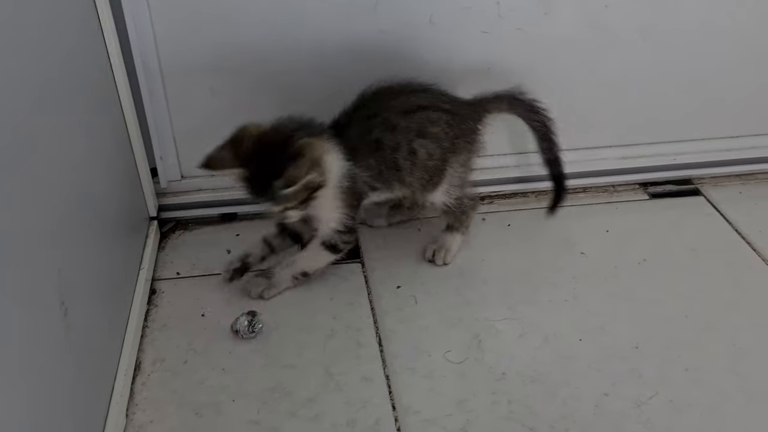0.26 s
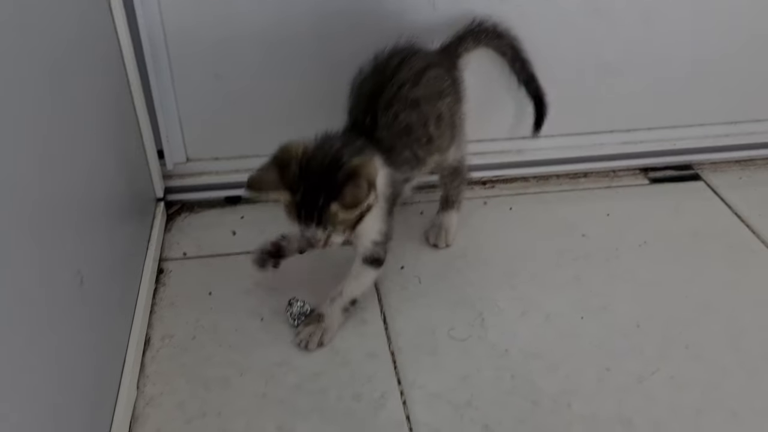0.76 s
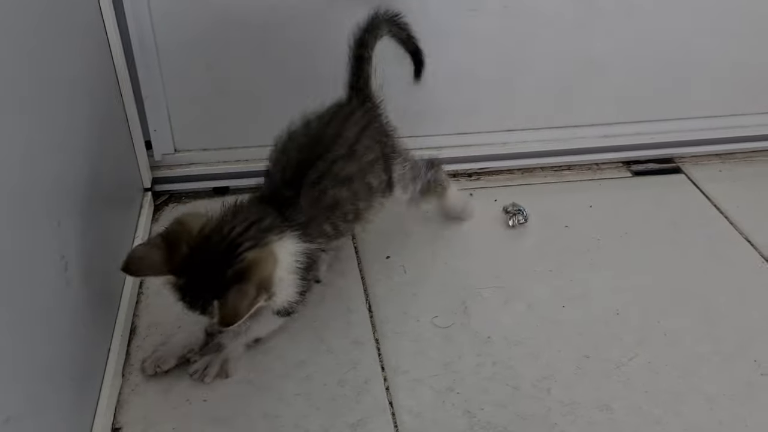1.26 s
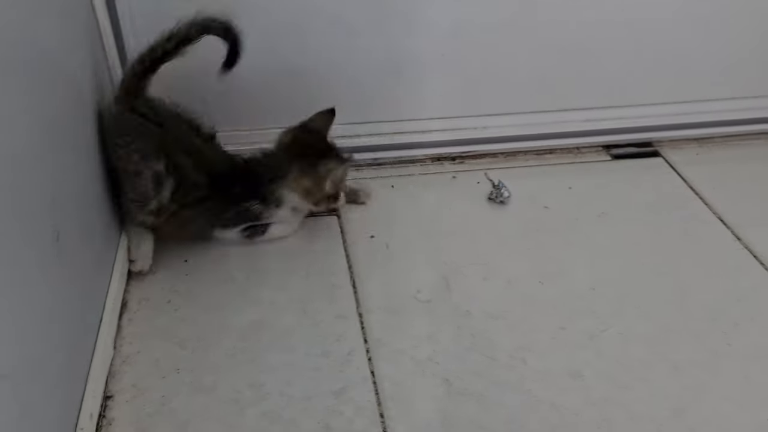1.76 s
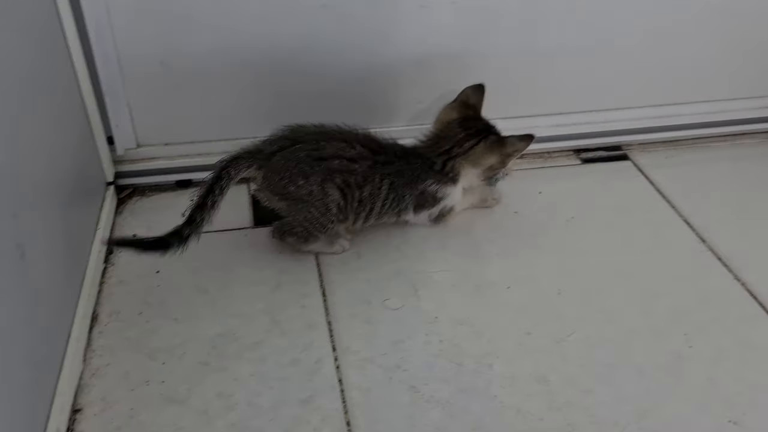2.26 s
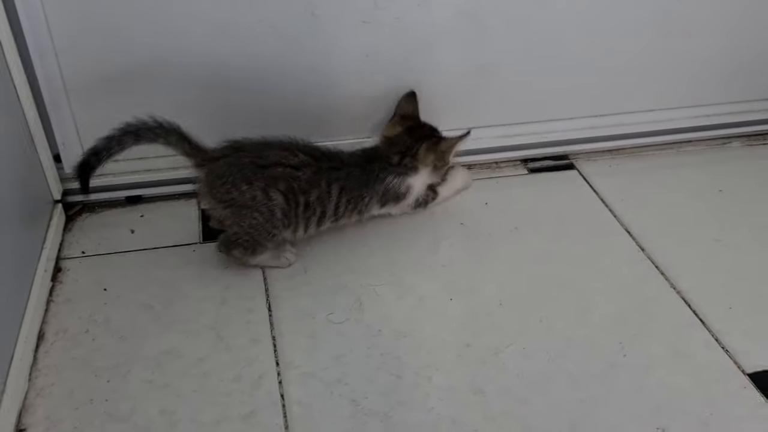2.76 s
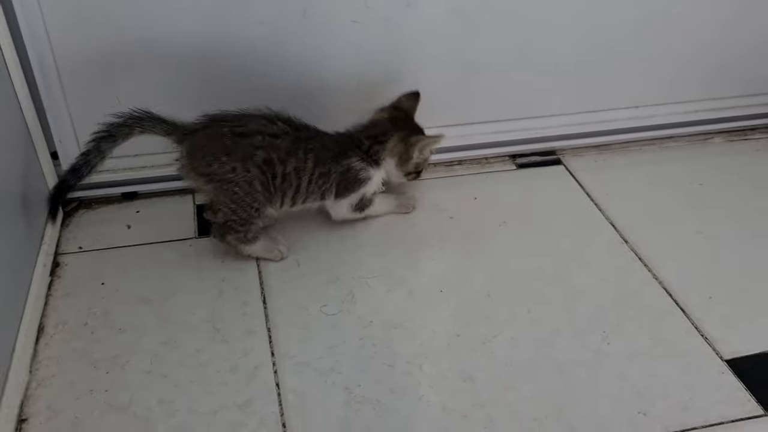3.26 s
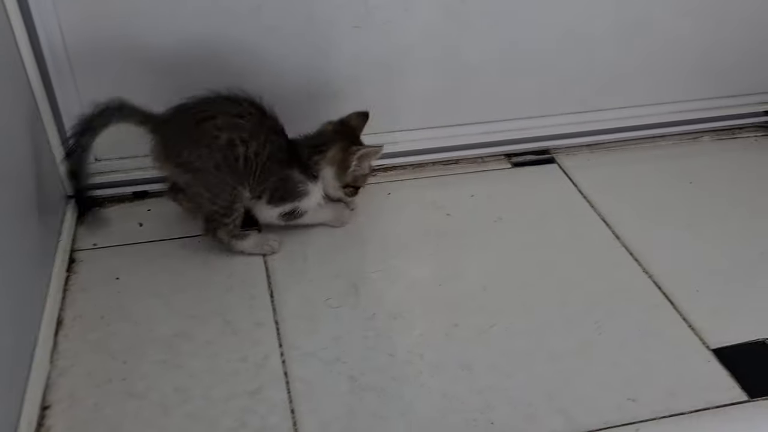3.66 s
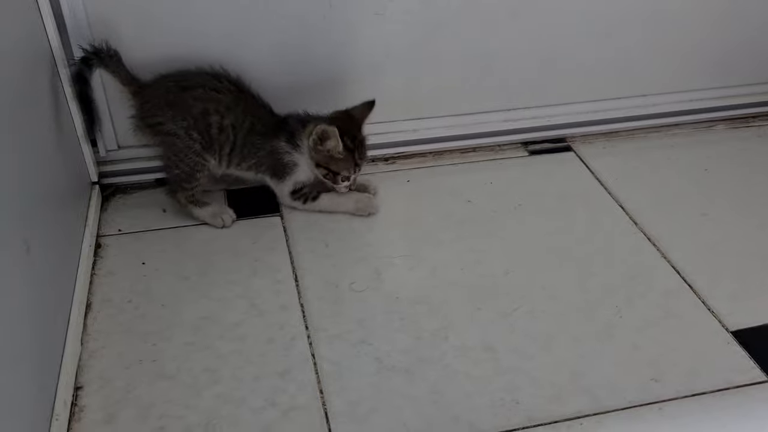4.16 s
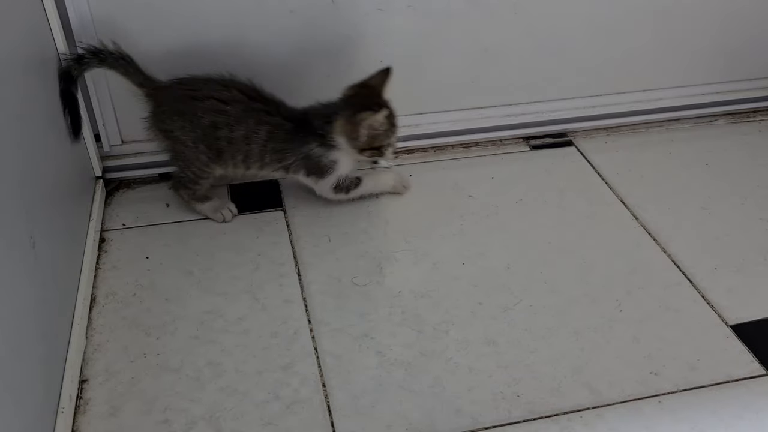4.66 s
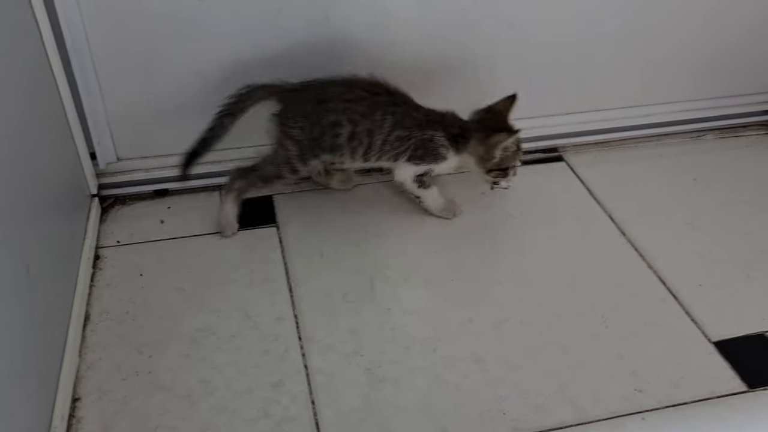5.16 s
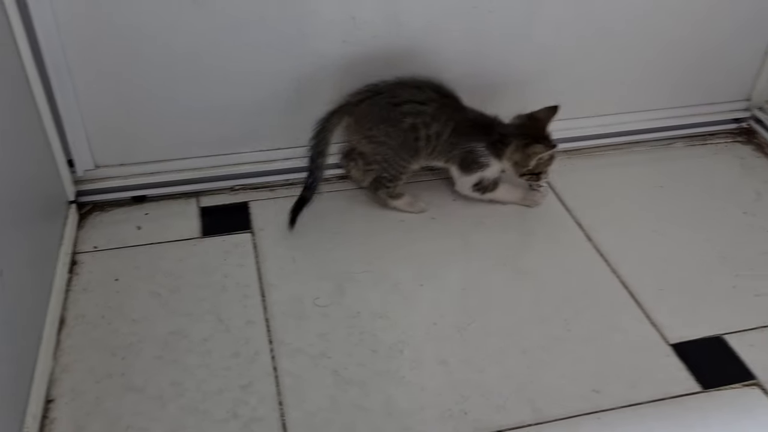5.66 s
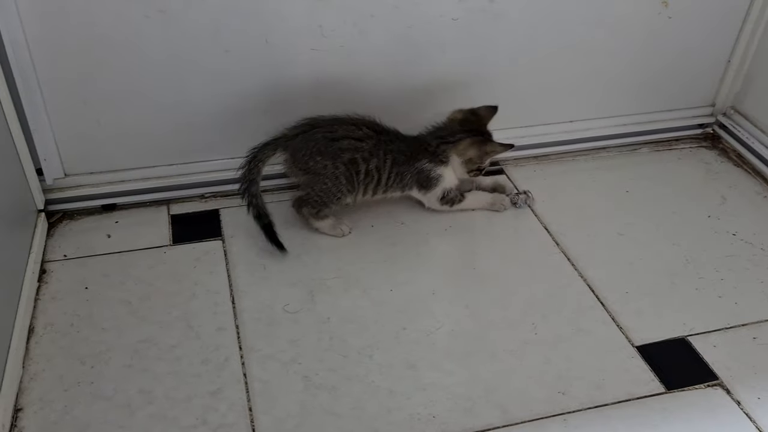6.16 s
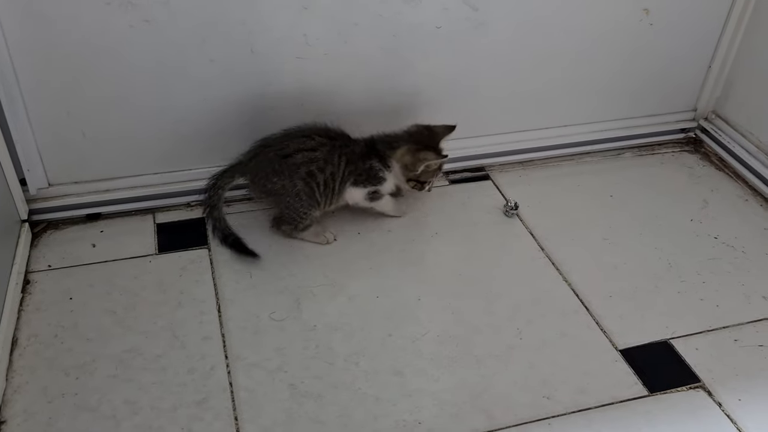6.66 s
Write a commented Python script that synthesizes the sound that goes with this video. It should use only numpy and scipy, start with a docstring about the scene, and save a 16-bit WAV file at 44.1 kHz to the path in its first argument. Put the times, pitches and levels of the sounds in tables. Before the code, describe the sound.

A kitten plays with a small crumpled foil ball on a tiled floor, heard from nearby with a short room echo. Low engine drones and rumble come dully through a door throughout, with tyre noise swelling around 2 seconds and then receding. From the start there are light, bright ticks and short scrapes of foil and claws, a soft paw shuffle at 0.7 seconds and a sharper tick at 1 second. Faint paw squeaks come at 1.5 and 1.7 seconds. Immediately afterwards the kitten bumps the door: a hollow thud with a brief rattle, by far the loudest sound. A flurry of ticks, scrapes and a tiny clink follows from 2 to 2.3 seconds. More taps and skids come from 3 to 3.7 seconds and near 4.4. Soft shuffles and small clinks return around 5.5 to 6 seconds, with faint last ticks near 6.4.

```python
"""Kitten with a foil ball

A kitten bats a small crumpled foil ball over floor tiles in the corner of a room.
The ball ticks, clinks and skids, claws scrape, and soft paws shuffle and squeak.
The kitten slides into the door, which thuds and rattles. Outside, traffic passes:
gliding engine drones and a swell of tyre noise come dully through the door."""
import sys
import numpy as np
from scipy import signal
from scipy.fft import rfft, irfft
from scipy.io import wavfile

SR = 44100
rng = np.random.default_rng(int(sys.argv[2]) if len(sys.argv) > 2 else 0)


def to_wav(sig):
    """Store sig (one row per channel, or 1-D mono) as 16-bit WAV at the path in sys.argv[1].

    Samples outside -1..1 are clipped; the rate is SR.
    """
    pcm = np.clip(np.atleast_2d(sig), -1, 1) * 32767
    pcm = np.round(pcm).astype(np.int16)
    wavfile.write(sys.argv[1], SR, pcm.T)  # frames by channels


N = 304712
TIME, FREQS = np.arange(N) / SR, np.fft.rfftfreq(N, 1 / SR)
TOP_HZ = 15900


def gain_of(db):
    """Turns decibels into a number to multiply by."""
    return 10 ** (np.asarray(db) / 20)


def evened(x):
    """Scales a signal to an average strength (rms) of 1."""
    return x / np.sqrt(np.mean(x ** 2) + 1e-20)


def read(points, hz):
    """Reads between the rows of a (frequency, value) table, giving each octave equal space."""
    f, value = np.transpose(points)
    return np.interp(np.log(hz + 1), np.log(f + 1), value)


def add(mix, s, sound):
    """Lays a sound into the stereo mix, starting at s seconds."""
    part = mix[:, max(round(s * SR), 0):][:, :sound.shape[-1]]
    part += sound[..., :part.shape[1]]


def drift(rate_hz):
    """A smooth random wobble; a higher rate makes it quicker."""
    return evened(irfft(rfft(rng.standard_normal(N)) * np.exp(-(FREQS / rate_hz) ** 2), N))


def panned(left_db):
    """Left and right gains that make the left side louder by left_db."""
    return gain_of(np.array([[left_db], [-left_db]]) / 2)


def diffuse(spectrum):
    """Noise that fills the room: alike on both sides in the bass, unrelated in the treble."""
    # how alike left and right are: (frequency [Hz], likeness [0 to 1])
    likeness = [(20, 0.89), (100, 1), (160, 0.93), (280, 0.87), (450, 0.64), (700, 0.44), (1100, 0.0031),
                (2000, 0), (16000, 0)]
    same = read(likeness, FREQS)
    left, other = rfft(rng.standard_normal((2, N)))
    right = same * left + np.sqrt(1 - same ** 2) * other
    return evened(irfft(np.array([left, right]) * gain_of(read(spectrum, FREQS)), N))


def engine(rows, level_db, waver, octave_db=-30):
    """One engine's drone: the door lets through only its firing note and a little of the octave above."""
    s, hz, db = np.transpose(rows)
    turn = np.exp(2j * np.pi * np.cumsum(np.interp(TIME, s, hz)) / SR)
    fade = np.clip(np.minimum(TIME - s[0], s[-1] - TIME) / .05 + 1, 0, 1)
    note = turn * (1 + waver * (drift(14) + 1j * drift(4.3)))
    octave = gain_of(octave_db) * turn ** 2 * drift(12)
    return np.sqrt(2) * fade * gain_of(np.interp(TIME, s, db) + level_db) * (note + octave).real


def drive_by(nearest_s=2.17, approach_s=.13, hz=136, drop_hz=13):
    """Rows for engine(): a passing vehicle is loudest when nearest, and its pitch falls."""
    along = np.linspace(-6, 6, 49)
    distance = np.hypot(1, along)
    pitch = hz - drop_hz * along / distance
    return np.transpose([nearest_s + approach_s * along, pitch, -20 * np.log10(distance)])


def engines():
    """Four engine drones from the street, each gliding in pitch; the far engine's octave also rises as a hum of
    its own."""
    # one line per table: (time [s], firing rate [Hz], level [dB]); far_hum is the far engine's octave, with its
    # pitch in the second column
    low_engine = [(0.11, 40.13, -51), (0.47, 47.77, -39.5), (0.8, 50.8, -39), (1.0, 52.35, -49.5),
                  (1.81, 54.04, -31), (2.05, 55.6, -41), (2.42, 54.7, -38.5), (2.62, 53.7, -28.5),
                  (3.02, 49.3, -51), (3.23, 45, -36), (3.56, 37.67, -29.5), (3.9, 33.55, -45)]
    high_engine = [(0.01, 97.8, -43.5), (0.48, 89.9, -48.5), (1.08, 93.7, -29), (1.2, 95.14, -38),
                   (1.35, 95.8, -28), (1.83, 98.5, -37), (2.29, 99.3, -38), (2.85, 98.36, -44),
                   (2.98, 99.15, -37.5), (3.33, 97.23, -53), (3.67, 95.7, -31.5), (4.09, 87.4, -40)]
    far_engine = [(3.96, 64.2, -42.5), (4.17, 67.47, -35), (4.55, 72.96, -35), (4.86, 76.4, -40.1),
                  (5.21, 68.6, -66), (5.49, 71.6, -40.5), (5.67, 71.55, -38.5), (5.89, 74, -58)]
    far_hum = [(5.0, 145, -64), (5.4, 147, -50.5), (5.9, 149, -51), (6.2, 151, -58.5), (6.91, 158, -58)]
    return (engine(low_engine, level_db=0, waver=0.28, octave_db=-34.5)
            + engine(high_engine, level_db=-0.5, waver=0.32, octave_db=-39)
            + engine(far_engine, level_db=-2.5, waver=0.63, octave_db=-17)
            + engine(far_hum, level_db=-3, waver=0.14)
            + engine(drive_by(), level_db=-46, waver=0.31))


def street_noise(spectrum, curve, nearest_db, follow):
    """One layer of traffic noise; it sinks by `follow` dB for each dB that its level curve falls."""
    s, db = np.transpose(curve)
    return gain_of(nearest_db + follow * np.interp(TIME, s, db - db.max())) * diffuse(spectrum)


def exhaust(nearest_s=0.77, fade_s=1.35, level_db=-55.5):
    """A rasping exhaust comes close early on, then draws away."""
    # tone of the rasp: (frequency [Hz], level [dB])
    rasp = [(300, -18), (500, 2.5), (600, 3), (700, -0.5), (820, -1.5), (950, -11.5), (1300, -23),
            (3000, -47.5)]
    return gain_of(level_db) / np.hypot(1, (TIME - nearest_s) / fade_s) * diffuse(rasp)


def standing_waves(x, depth_db=2.0, spacing_hz=23.79):
    """Sound bouncing between the walls lifts some frequencies and sinks others."""
    ripple = np.interp(FREQS / spacing_hz, np.arange(4096), rng.standard_normal(4096))
    return irfft(rfft(x) * evened(gain_of(depth_db * ripple)), N)


def traffic():
    """Engines, road rumble and tyres: as the traffic draws away the treble fades fastest."""
    # rise and fall of the road and tyre noise: (time [s], level [dB])
    road_curve = [(0.0, -53.5), (1.65, -52.5), (1.94, -49.5), (3.12, -54), (3.98, -52.5), (4.79, -57.5),
                  (5.72, -57), (6.0, -58.5), (6.39, -59), (6.91, -59.5)]
    tyre_curve = [(0.0, -58.5), (0.65, -56.5), (1.58, -57), (2.13, -52.5), (2.29, -53), (2.89, -57.5),
                  (3.06, -58), (4.58, -66), (5.16, -64.5), (5.39, -67), (5.91, -67.5), (6.31, -69.5),
                  (6.91, -71)]
    # tone of each layer behind the door, lowest first: (frequency [Hz], level [dB])
    rumble = [(15, -27.5), (27, -46.5), (37, 4.5), (48, -1.5), (62, -3.5), (76, -0.5), (86, -4), (97, 3),
              (112, -9.5), (150, -17.5), (200, -21.5), (400, -69)]
    body = [(90, -21), (150, -2), (195, -7), (225, 5), (260, 3), (330, -4.5), (390, -4), (490, -7),
            (600, -16), (800, -37.5), (3000, -64.5)]
    roar = [(500, -32), (850, -7), (1050, -1.5), (1250, -3.5), (1450, -6), (1800, -14), (4000, -52)]
    tread = [(900, -23), (1400, -10), (1600, 0), (1830, 4.5), (1950, 2), (2080, 0), (2350, -8.5),
             (2800, -13.5), (4000, -38), (8000, -55.5)]
    hiss = [(1500, -5.5), (2500, 5.5), (3300, 3.5), (4200, 2), (5100, -5.5), (6000, -1.5), (7200, -8.5),
            (8500, -22), (11500, -15.5), (16000, -27.5)]
    low = engines() + street_noise(rumble, road_curve, nearest_db=-38.5, follow=0.51)
    low += street_noise(body, road_curve, nearest_db=-49, follow=.9)
    high = exhaust() + street_noise(roar, tyre_curve, nearest_db=-53, follow=0.77)
    high += street_noise(tread, tyre_curve, nearest_db=-53.5, follow=1.256)
    high += street_noise(hiss, tyre_curve, nearest_db=-61.5, follow=1.72)
    return low * panned(left_db=0.1) + standing_waves(high) * panned(left_db=-2.5)


def stroke(start, peak, end, edge_db):
    """The swell and fade of one paw stroke; a larger edge_db makes it more pointed."""
    t = np.arange(start, end, 1 / SR)[:16000]
    away = abs(np.interp(t, [start, peak, end], [-1, 0, 1]))
    return gain_of(-edge_db * away ** 1.11) * np.sqrt(np.clip(1 - away ** 4, 0, 1))


def press(peak, length, edge_db):
    """Start time and loudness shape of a paw that presses harder, then lets go."""
    start = peak - .4 * length
    return start, stroke(start, peak, start + length, edge_db)


def contacts(envelope, top_db, low_db, grain_db, facets_db=2.8):
    """A swarm of tiny contacts rings the foil; each touch meets other folds, so its tone varies."""
    # tone of foil on tile: (frequency [Hz], level [dB])
    foil = [(300, -4.5), (1000, 3), (2100, 2.5), (2700, -3.5), (3500, -5), (4500, -3), (5900, 1.5),
            (7300, 1.5), (8500, -0.5), (10200, 2), (11900, 8), (13300, 2), (15000, 6), (16000, 0.5)]
    size = 16384
    hz = np.fft.rfftfreq(size, 1 / SR)
    grains = gain_of(grain_db * np.minimum(rng.exponential(1, size // 16), 4)).repeat(16)
    swarm = evened(rng.standard_normal((2, size)) * grains)[:, :len(envelope)] * envelope
    facets = facets_db * np.interp(hz, np.linspace(0, SR / 2, 56), rng.standard_normal(56))
    # low_db and top_db lift or cut the treble below and above the band around 6 kHz
    slant = read([(2200, min(low_db, 2)), (3700, low_db), (5400, 0.006), (7400, 0.0031),
                  (10500, top_db)], hz)
    colour = evened(gain_of(read(foil, hz) + slant + facets) * (hz < TOP_HZ))
    click = np.roll(irfft(colour), 128)[None, :256]
    return signal.fftconvolve(swarm, click, axes=1)[:, 128:]


def catches(per_s=55, spike_db=7, fall_s=.0012):
    """Brief jumps in loudness as a dragged ball snags on the glaze at random."""
    spikes = (rng.random(N) < per_s / SR) * rng.uniform(.2, 1, N)
    return 1 + gain_of(spike_db) * signal.lfilter([1], [1, -np.exp(-1 / (fall_s * SR))], spikes)


def scrapes(level_db=-0.5, judder_db=2.0):
    """The ball or a claw is dragged along, catching unevenly on the glaze."""
    # strokes: (hardest press [s], length [s], level [dB], top treble [dB], low treble [dB])
    drags = [(0.048, 0.12, -58, -8, -1), (0.442, 0.15, -49, -5.5, -7.5), (0.509, 0.067, -50, -11, 1.5),
             (0.56, 0.09, -60, -2, -18), (0.702, 0.11, -54.5, -4.5, 2.5), (0.917, 0.1, -62.5, -4, 4),
             (1, 0.056, -62, -6, 10.5), (1.187, 0.39, -64.5, -13.5, 3), (1.779, 0.13, -52.5, -5.5, 12),
             (2.014, 0.045, -51, 0, -7), (2.067, 0.057, -44.5, -11, 4), (2.164, 0.066, -47, 1.5, 9),
             (2.243, 0.054, -55.5, -2, 7), (2.32, 0.18, -71, -6, 21), (2.481, 0.067, -74, -7, -5),
             (3.001, 0.082, -66.5, -7, 10), (3.085, 0.07, -60, -6, 14), (3.212, 0.08, -55, -27, 2),
             (3.307, 0.14, -61.5, -16, 12), (3.56, 0.039, -64, -14.5, -4), (3.806, 0.077, -70.5, -14, -5),
             (4.076, 0.085, -75.5, -10, -4), (4.216, 0.26, -75, -13, 3), (4.369, 0.135, -54, -6, 7),
             (4.808, 0.13, -66, -14, 8), (5.574, 0.058, -71, -5, 7), (6.166, 0.07, -67.5, 0, -5),
             (6.389, 0.063, -72, -5, 2)]
    out = np.zeros((2, N))
    for peak, length, db, top_db, low_db in drags:
        start, envelope = press(peak, length, edge_db=18)
        add(out, start, gain_of(db + level_db) * contacts(envelope, top_db, low_db, grain_db=3.0))
    return out * gain_of(judder_db * drift(140)) * catches()


def taps(rise_s=0.00055, fall_s=0.0047, ring_db=-17, ring_s=0.0057, hop_s=0.056, hop_db=-18):
    """Ball and claws strike the tiles: a tick with a short ring, then two ever weaker hops."""
    # strikes: (time [s], level [dB], top treble [dB], low treble [dB])
    strikes = [(0.037, -52.5, -2, 13), (0.133, -55, -9, -20), (0.619, -56, 0, 3), (0.887, -59, -16, -18),
               (1.026, -42.5, -5, -8), (1.029, -41, 3, 4), (1.085, -55.5, -5, 10), (1.117, -53, -6, 4),
               (1.134, -57, -12, -2), (1.161, -58, -13, -4), (1.261, -56, -22.5, 7), (1.729, -56, -23, 10),
               (2.001, -51.5, -13, 8), (2.057, -47.5, -5, 3), (2.159, -42, -2, -8), (2.242, -51, 4, -1),
               (2.305, -55.5, -11, -11), (2.997, -57.5, -7.5, 2), (3.079, -55, -6, 2), (3.222, -51, -6, -4),
               (3.353, -54.5, -14, 9), (3.642, -50, -13, -11), (3.646, -54, 4, -11), (3.705, -73, -5, -8),
               (4.448, -57, -11, 10.5), (5.492, -72, -5, -10), (5.577, -59, -8, 31), (5.656, -61, -19, 7),
               (5.723, -61, -13, 8), (5.806, -48, -0.5, -14), (5.811, -63, 4, -15), (5.843, -54.5, -4, -20),
               (6.008, -62.5, -10, -12), (6.158, -57.5, 5, -12), (6.344, -60.5, -2, -2.5),
               (6.372, -60, -2, -6), (6.392, -58, -5, -17)]
    # notes of the ball, woken by chance at each touch: (pitch [Hz], level [dB])
    ball = [(5300, -4.5), (5950, -2.5), (6330, 3.5), (6800, 0), (7150, -4), (10450, -2), (11550, -8),
            (12000, -6.5)]
    out, t = np.zeros((2, N)), np.arange(2400) / SR
    attack = 1 - np.exp(-t / rise_s)
    envelope = attack * np.exp(-t / fall_s)
    ring_shape = attack * np.exp(-t / ring_s)
    notes = np.array([gain_of(db + ring_db) * ring_shape * np.sin(2 * np.pi * hz * t) for hz, db in ball])
    for s, db, top_db, low_db in strikes:
        for hop in range(3):
            tick = contacts(envelope / envelope.max(), top_db, low_db, grain_db=2.4)
            ring = rng.uniform(-1, 1, (2, len(ball))) @ notes
            add(out, s - rise_s, gain_of(db + hop * hop_db) * (tick[:, :len(t)] + ring))
            s += hop_s * rng.uniform(.5, 2)
    return out


def clinks(rise_s=.0005, ring_s=0.0081):
    """The ball lands on a stiff fold and gives one clear note."""
    # landings: (time [s], pitch [Hz], level [dB])
    landings = [(0.133, 7220, -62), (1.319, 6820, -59.5), (2.159, 10300, -45), (3.567, 5892, -60),
                (3.797, 5026, -66), (4.449, 4036, -59), (4.471, 3960, -69), (5.765, 4957, -72),
                (5.806, 5200, -61), (5.842, 6700, -66), (6.158, 10400, -62)]
    out, t = np.zeros((2, N)), np.arange(SR // 10) / SR
    envelope = (1 - np.exp(-t / rise_s)) * np.exp(-t / ring_s)
    for s, hz, db in landings:
        add(out, s, gain_of(db) * envelope * np.sin(2 * np.pi * hz * t))
    return out


def scuffs():
    """Soft paws shuffle over the floor with a dull rubbing sound."""
    # shuffles: (start [s], peak [s], end [s], level [dB])
    shuffles = [(0.62, 0.694, 0.68, -46), (2.028, 2.076, 2.27, -50.5), (4.771, 4.8, 4.86, -61),
                (5.502, 5.644, 5.68, -51.5), (5.637, 5.695, 6, -53.5)]
    # tone of a rubbing paw: (frequency [Hz], level [dB])
    pad = [(80, -26), (140, 15), (260, 2), (480, 10), (620, -10.5), (810, 6), (1200, -26), (2000, -13.5),
           (2800, -33), (8000, -32)]
    level = np.zeros((2, N))
    for start, peak, end, db in shuffles:
        add(level, start, gain_of(db) * stroke(start, peak, end, edge_db=12))
    return level * diffuse(pad)


def slips(width_hz=450, level_db=-1.0):
    """A sliding paw sticks and slips, making a fuzzy squeak whose pitch follows its speed."""
    # squeaks: (hardest press [s], length [s], first pitch [Hz], last pitch [Hz], level [dB])
    squeaks = [(1.481, 0.11, 4985, 4650, -65), (1.702, 0.13, 6420, 4390, -62),
               (5.112, 0.14, 5235, 5610, -84), (6.694, 0.055, 5760, 5100, -81)]
    out = np.zeros((2, N))
    fuzz = np.array([drift(width_hz) + 1j * drift(width_hz) for _ in range(2)])
    for peak, length, first_hz, last_hz, db in squeaks:
        start, envelope = press(peak, length, edge_db=11)
        pitch = np.linspace(first_hz, last_hz, len(envelope))
        turn = np.exp(2j * np.pi * np.cumsum(pitch) / SR)
        squeak = (turn * fuzz[:, round(start * SR):][:, :len(turn)]).real
        add(out, start, gain_of(db + level_db) * envelope * squeak)
    return out


def door(rattle_s=0.012, push_s=0.0028):
    """The kitten's body bumps the door panel, which rings and chatters in its frame."""
    # bumps: (time [s], level [dB], contact time [s], rattle [dB])
    blows = [(1.726, -19.5, 0.0011, -2.5), (1.7323, -28, 0.0011, 2), (1.7643, -30.5, 0.0013, 3.5),
             (1.779, -24, 0.0024, -14), (1.796, -19, 0.0062, -26), (2.189, -39, 0.0017, -22),
             (2.986, -43.5, 0.0016, -27)]
    # notes of the panel: (pitch [Hz], level [dB], time to fade by 60 dB [s])
    panel = [(77.8, -15.5, 1), (117, -16.5, 0.4), (135.4, -9, .45), (159, -8, 0.26), (237.8, 1.5, 0.088),
             (258.9, 2.5, 0.21), (292, -15, 0.07), (375.9, 1.5, 0.048), (439, -9, 0.14), (475, -6, 0.11),
             (534, -33.5, 0.29), (653, -18, 0.27), (724, -19.5, 0.099), (750, -29.5, 0.076),
             (981, -14, 0.15), (1064, -18.5, 0.23), (1042, -38, 0.29), (1152, -8.5, 0.1), (1500, -23, 0.3)]
    out, t = np.zeros((2, N)), np.arange(SR // 2) / SR
    chatter = diffuse([(100, -14), (250, 13.5), (400, 3), (750, 0), (1200, -10.5), (1600, -30),
                       (4000, -26), (9000, -50)])
    for s, db, contact_s, rattle_db in blows:
        ring = sum(gain_of(note_db - 60 * t / fade_s) * -np.sin(2 * np.pi * hz * t)
                   / np.hypot(1, 2 * hz * contact_s)  # a longer contact wakes high notes less
                   for hz, note_db, fade_s in panel)
        ring *= 1 - np.exp(-t / push_s)
        rattle_shape = gain_of(rattle_db) * (1 - np.exp(-t / contact_s)) * np.exp(-t / rattle_s)
        rattle = chatter[:, round(s * SR):][:, :len(t)] * rattle_shape
        add(out, s, gain_of(db) * (ring + rattle))
    return out


def room(x, early_db, tail_db, early_s):
    """Adds quick echoes from the corner, then a tail that lasts longest in the bass."""
    # the room's tail: (frequency [Hz], time to fade by 60 dB [s])
    fade_times = [(100, 0.93), (500, 0.17), (3000, 0.34), (8000, 0.19), (16000, 0.027)]
    t = np.arange(SR // 2) / SR
    shape = (2, len(t))
    bounces = rng.choice([-1., 1.], shape) * (rng.random(shape) < 4000 / SR) * (t > .001)
    early = bounces * np.exp(-t / early_s)
    hz, when, bands = signal.stft(rng.standard_normal(shape) * (t > .005), SR, nperseg=256)
    bands *= gain_of(-60 * when / read(fade_times, hz)[:, None])
    tail = signal.istft(bands, SR, nperseg=256)[1][:, :len(t)]
    echo = sum(gain_of(db) * part / np.linalg.norm(part, axis=1, keepdims=True)
               for db, part in ((early_db, early), (tail_db, tail)))
    return x + signal.fftconvolve(x, echo, axes=1)[:, :N]


def scene(air_db=-79):
    """The kitten's play in the tiled corner, over the street and the room's faint hiss."""
    # tone of the hiss: (frequency [Hz], level [dB])
    air = [(100, 3), (3000, 5), (5000, 4.5), (5900, -13), (7000, -6), (9000, -13), (16000, -1.5)]
    touches = taps() + clinks() + scrapes() + slips()
    play = room(touches, early_db=-1.5, tail_db=-8.0, early_s=0.013)
    thud = room(door(), early_db=-17, tail_db=-16, early_s=.012)
    return play + thud + scuffs() + traffic() + gain_of(air_db) * diffuse(air)


def record(dry):
    """Cuts away the treble above TOP_HZ."""
    low_pass = signal.firwin(511, TOP_HZ, window=("kaiser", 9), fs=SR)
    return signal.oaconvolve(dry, low_pass[None], "same")


dry = scene()
out = record(dry)
to_wav(out)
```